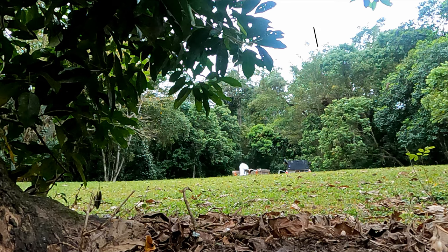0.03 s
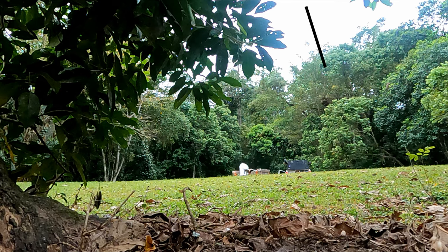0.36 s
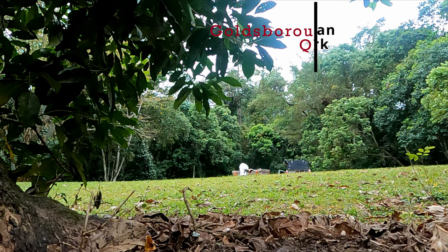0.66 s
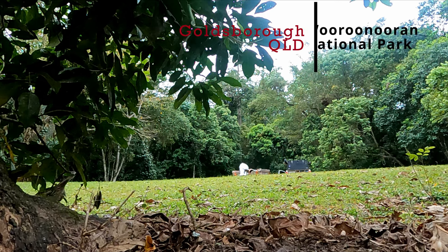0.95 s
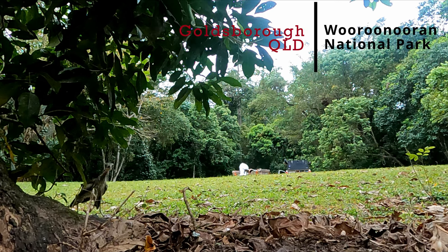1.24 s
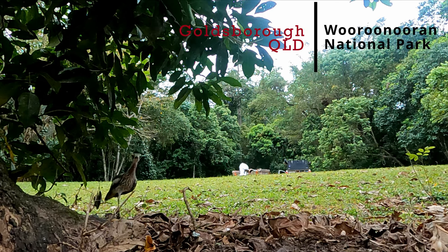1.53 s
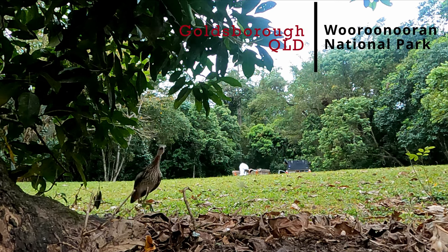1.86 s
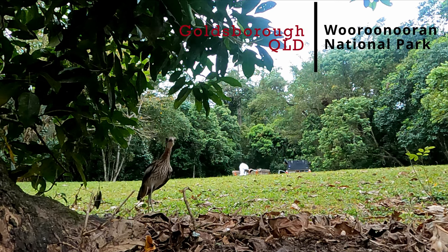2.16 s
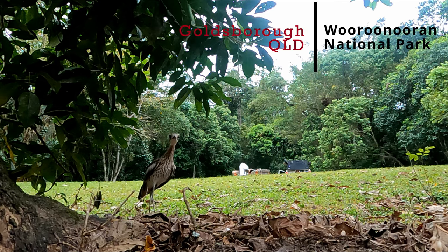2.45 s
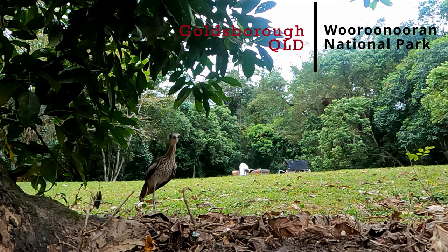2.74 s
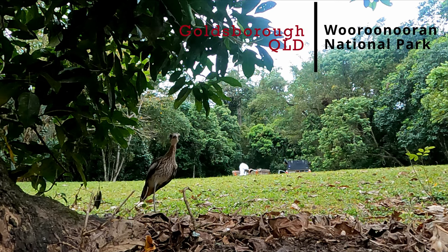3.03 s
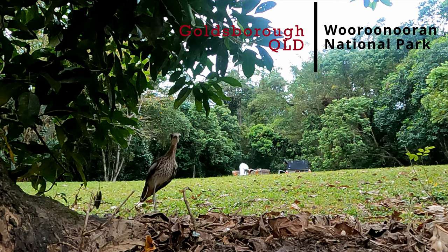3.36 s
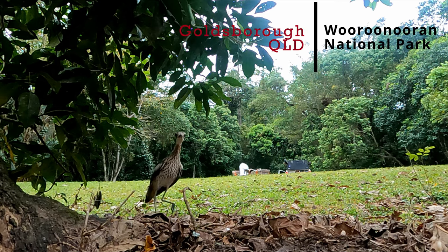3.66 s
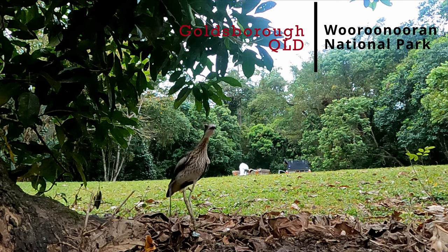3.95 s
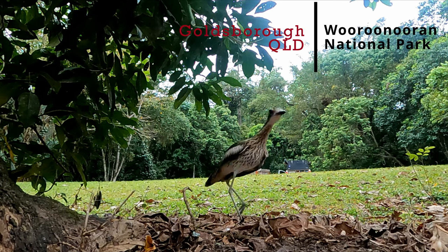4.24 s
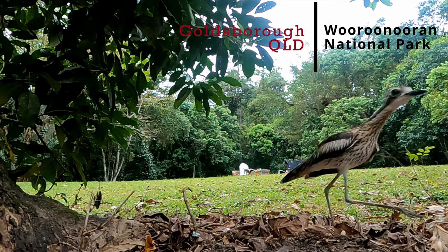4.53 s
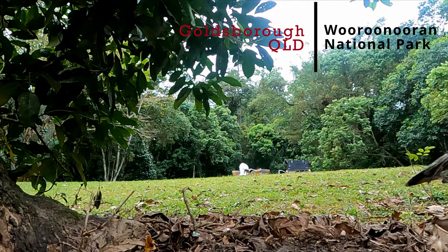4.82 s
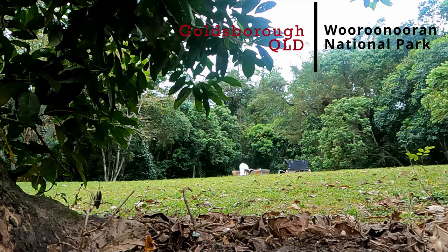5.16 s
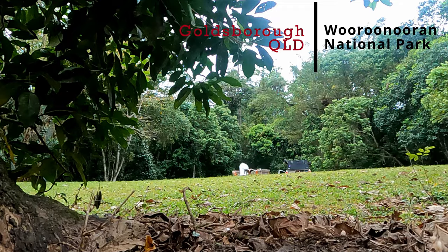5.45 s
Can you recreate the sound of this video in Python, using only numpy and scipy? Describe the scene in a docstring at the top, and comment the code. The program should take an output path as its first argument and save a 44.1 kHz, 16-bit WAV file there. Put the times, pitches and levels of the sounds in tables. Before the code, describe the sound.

A bird walks through dry leaf litter at the edge of a forest clearing. A quick flurry of crackling steps and snapping twigs gives way to a pause with small rustles. Then a louder flurry of crunches and soft thumps follows as it hurries close past the microphone. Faint far birds pipe and whistle throughout, over a low rush of air and a soft high hiss.

```python
"""Edge of a forest clearing: a long-legged bird walks through dry leaf litter. A flurry of steps,
a pause with small stirrings, then a louder flurry as it hurries past close by.
Leaves crackle and crush in many tiny fractures and scrape by stick-slip; twigs snap, knocked sticks
ring, feet thump the soil. Far birds pipe and whistle in the trees over low air and a soft high hiss."""
import sys
import numpy as np
from scipy import signal
from scipy.fft import rfft, irfft, next_fast_len
from scipy.io import wavfile
from scipy.ndimage import uniform_filter1d, map_coordinates

SR = 44100
rng = np.random.default_rng(int(sys.argv[2]) if len(sys.argv) > 2 else 0)


def master_out(mix):
    """Clip the mix to full scale and print it as 16-bit PCM to the path in sys.argv[1]."""
    frames = np.transpose(np.atleast_2d(mix))
    ceiling = np.clip(frames, -1, 1)
    pcm = np.round(ceiling * 32767).astype(np.int16)
    wavfile.write(sys.argv[1], SR, pcm)


N = 250929

# walking bird's path: t/s, left minus right/dB, nearness/0-1
PATH = [(1, 0, 0.7), (3.8, 0, 0.66), (4.55, -1, 0.87), (4.75, -1.5, 0.55), (4.96, -2.5, 1), (5.3, -1, 1)]
# fracture spectra of leaf edges, deep litter, whole leaves: f/Hz, level/dB
CRACKLE_SPECTRUM = [(300, -47), (1200, -20), (1900, -15), (2500, -11), (3300, -11), (4200, -0.5),
                    (5500, -0.5), (7000, -1.5), (8300, -10), (10500, -16.5), (12400, -16), (15500, -42)]
CRUSH_SPECTRUM = [(60, -35), (115, -13.5), (175, 3), (270, 1), (420, 0.5), (690, 0), (880, -8.5),
                  (1060, -3), (1500, -3.5), (1950, -16), (2800, -11.5), (4500, -26), (11000, -60)]
TEAR_SPECTRUM = [(600, -19.5), (1100, -4), (1900, 1), (2700, -0.5), (3800, 0), (5500, -5.5), (12000, -17),
                 (15500, -32)]


def amp(db):
    """Decibels to gain."""
    return 10 ** (np.asarray(db) / 20)


def unit(x):
    """x at rms 1."""
    return x / np.sqrt(np.mean(x ** 2) + 1e-20)


def clock():
    """Sample times in s."""
    return np.arange(N) / SR


def along(points, hz):
    """(f/Hz, value) points interpolated on a log axis."""
    f, v = np.transpose(points)
    return np.interp(np.log(hz + 1), np.log(f + 1), v)


def wobble(knots_per_s):
    """Smooth random curve."""
    return map_coordinates(rng.standard_normal(int(N * knots_per_s / SR) + 4), [clock() * knots_per_s])


def filtered(x, response):
    """x through a gain given as a function of f/Hz."""
    size = next_fast_len(N + SR // 2)
    return irfft(rfft(x, size) * response(np.fft.rfftfreq(size, 1 / SR)), size)[..., :N]


def struck(x, spectrum, size=2048):
    """Impulses x ring a minimum-phase, unit-energy response with this spectrum."""
    cepstrum = irfft(np.log(amp(along(spectrum, np.fft.rfftfreq(size, 1 / SR)))))
    cepstrum[1:size // 2] *= 2
    cepstrum[size // 2 + 1:] = 0
    ring = irfft(np.exp(rfft(cepstrum)))
    return signal.fftconvolve(x, ring[None] / np.linalg.norm(ring), axes=1)[:, :N]


def scattered(x, t60_s, size):
    """Diffuse echo off many surfaces, different at each ear."""
    t = np.arange(size) / SR
    tail = rng.standard_normal((2, size)) * amp(-60 * t / t60_s)
    tail /= np.linalg.norm(tail, axis=1, keepdims=True)
    return signal.fftconvolve(np.atleast_2d(x), tail, axes=1)[:, :N]


def rush(spectrum):
    """Stereo noise of rms 1, narrow in the bass, widest in the mids."""
    # f/Hz, left-right correlation
    coherence = [(60, 0.88), (150, 0.87), (300, 0.52), (640, 0.35), (1400, 0.19), (4000, 0.5),
                 (12000, 0.73)]

    def mid_side_gains(hz):
        angle = np.arccos(np.clip(along(coherence, hz), -1, 1)) / 2
        return amp(along(spectrum, hz)) * [np.cos(angle), np.sin(angle)]

    mid, side = filtered(rng.standard_normal((2, N)), mid_side_gains)
    return unit(np.array([mid + side, mid - side]))


def air():
    """Low, slightly wavering rush of air."""
    # f/Hz, level/dB
    spectrum = [(15, -24), (45, -8), (70, -13), (108, -20.5), (150, 1.5), (200, 0), (300, -2.5), (400, -10),
                (650, -16.5), (860, -21), (1100, -13), (1400, -15), (1900, -20.5), (3200, -27.5),
                (7000, -56)]
    return amp(-46 + 0.7 * wobble(7.3)) * rush(spectrum)


def high_hiss():
    """High background hiss of insects, far bird echoes and faint rustle, rising and falling in level."""
    # f/Hz, level/dB
    spectrum = [(2500, -23), (3700, -11), (4400, -3), (5000, 1.5), (6200, -1.5), (7300, -1), (8200, -17),
                (10000, -24), (12500, -26.5), (14500, -66)]
    # t/s, level/dB
    levels = [(0, -44), (.55, -50.5), (1.05, -45), (1.75, -50.5), (2.2, -45.5), (3.05, -47), (3.6, -45),
              (3.879, -50), (4.5, -46.5), (5.35, -45), (5.69, -50.5)]
    level_db = np.interp(clock(), *np.transpose(levels)) - 1.5 + 0.63 * wobble(18)
    return amp(level_db) * rush(spectrum)


def note(start_s, length_s):
    """Progress 0-1 through a note, and its rounded swell."""
    progress = np.clip((clock() - start_s) / length_s, 0, 1)
    return progress, np.sqrt(np.abs(np.sin(np.pi * progress)))


def piper():
    """Arched, wavering bird notes that open on harmonics 2 and 3 and swell into 4."""
    # t/s, fundamental/Hz, level/dB
    notes = [(0.415, 1130, -47.5), (2.31, 1116, -48), (2.6, 1131, -42.5), (2.955, 1129, -45.5),
             (3.23, 1099, -44.5), (5.29, 1170, -46), (5.485, 1160, -48.5)]
    out, waver = np.zeros(N), 1 + 0.0095 * wobble(160)
    for start_s, hz, db in notes:
        progress, swell = note(start_s, length_s=0.155)
        pitch_hz = hz * waver * (1 - 0.038 * (1 - swell))
        phase = 2 * np.pi * np.cumsum(pitch_hz) / SR
        on = swell > .001
        second, third, fourth = np.sin(np.outer([2, 3, 4], phase[on]))
        fade = 1 - progress[on]
        opening = amp(-9.5) * np.sqrt(fade) * second + amp(-13.5) * fade ** 2 * third
        out[on] += amp(db + 4.5) * swell[on] * (opening + swell[on] * fourth)
    return out * amp(1.7 * wobble(45))


def whistlers():
    """Small birds' gliding whistles, made buzzy by fast pitch flutter."""
    # t/s, length/s, centre f/Hz, glide/Hz, buzz width/Hz, level/dB
    calls = [(-.03, 0.083, 4620, 2, 130, -43), (0.021, 0.11, 4760, 198, 190, -43.5),
             (0.061, 0.055, 4963, 3, 45, -39), (0.248, 0.097, 7200, 99.5, 394, -50.5),
             (0.256, 0.084, 6520, -400, 71, -38.5), (0.299, 0.11, 6910, -1.5, 60.5, -44),
             (0.348, 0.054, 3180, 100, 85, -53.5), (0.547, 0.097, 7200, 130, 130, -46),
             (.705, 0.073, 5440, 120.5, 281, -45), (0.877, 0.071, 5910, 129.5, 341, -42.5),
             (1.072, 0.074, 7030, 131.5, 352, -43.5), (1.293, 0.093, 7030, 137, 288, -44.5),
             (2.334, 0.08, 7130, 131, 240, -50), (3.283, 0.07, 7330, 130, 221, -52),
             (4.05, 0.07, 6830, 280, 90, -38), (5.461, 0.072, 7080, 133.5, 227, -46)]
    out, flutter = np.zeros(N), wobble(700)
    for start_s, length_s, hz, glide_hz, buzz_hz, db in calls:
        progress, swell = note(start_s, length_s)
        pitch_hz = hz + glide_hz * (progress - .5) + buzz_hz * flutter
        out += amp(db + 5.5) * swell * np.sin(2 * np.pi * np.cumsum(pitch_hz) / SR)
    return out


def distant(song, echo_db):
    """Direct song plus echo from the trees ahead and, weaker, from those around."""
    ahead, around = scattered(song, t60_s=1.0, size=SR)
    return amp(-3) * song + amp(echo_db) * (ahead + amp(-7) * np.array([around, -around]))


def forest():
    """Far birds, air and high hiss, 1 dB louder on the right."""
    birds = distant(piper(), echo_db=-3.5) + distant(whistlers(), echo_db=-2)
    return (birds + air() + high_hiss()) * amp([[-.5], [.5]])


def scrapes():
    """A stiff leaf edge sticks and slips; the slips ring one resonance of the leaf."""
    # peak t/s, f/Hz, level/dB, half-length/s
    chirps = [(1.997, 3970, -41.5, 0.037), (2.531, 4200, -44.5, 0.017)]
    slips_per_s, width_hz = 720, 1000
    out = np.zeros((2, N))
    for peak_s, hz, db, half_s in chirps:
        leaf = signal.butter(2, [hz - width_hz / 2, hz + width_hz / 2], "bandpass", fs=SR, output="sos")
        slips = (rng.random(N) < slips_per_s / SR) * rng.choice([-1, 1], N)
        swell = np.exp(-2 * ((clock() - peak_s) / half_s) ** 2)
        out += amp(db) * swell * unit(signal.sosfilt(leaf, slips))
    return out


def sticks():
    """A foot knocks a fallen stick, which rings briefly on the damp ground."""
    # t/s, level/dB
    knocks = [(1.5102, -31.5), (1.5398, -23.5), (1.8388, -18), (4.558, -22.5), (5.151, -19.5)]
    # f/Hz, level/dB, t60/s
    modes = [(620, -6, 0.023), (1154, -3, 0.019), (1550, -9, 0.018)]
    out, t = np.zeros(N), np.arange(SR // 20) / SR
    for start_s, db in knocks:
        for hz, mode_db, t60_s in modes:
            mode = np.sin(2 * np.pi * hz / rng.normal(1, 0.065) * t)
            out[round(start_s * SR):][:len(t)] += amp(db + mode_db - 60 * t / t60_s) * mode
    return out


def thumps():
    """A footfall on soil gives a few low, quickly damped cycles."""
    # t/s, level/dB, f/Hz
    footfalls = [(1.5409, -28, 317), (1.619, -30, 400), (1.839, -19.5, 402), (1.871, -22, 454),
                 (4.711, -18, 228), (4.957, -9, 200), (4.967, -15, 165), (5.129, -19, 106)]
    rise_s, t60_s = 0.0031, 0.033
    out, t = np.zeros(N), np.arange(SR // 10) / SR
    for start_s, db, hz in footfalls:
        envelope = amp(db + 5.5 - 60 * t / t60_s) * (1 - np.exp(-t / rise_s))
        out[round(start_s * SR):][:len(t)] += envelope * np.sin(2 * np.pi * hz * t)
    return signal.sosfilt(signal.butter(2, 100, "highpass", fs=SR, output="sos"), out)


def twigs():
    """A snap is a click and a few ms of splintering; thick twigs add a woody body."""
    # t/s, level/dB, relative body level/dB, splintering t60/s
    snaps = [(1.153, -19, -12.5, 0.012), (1.6797, -10, -25.5, .012), (1.8029, -20, 9, 0.005),
             (1.8503, -3, -8, 0.021), (1.855, 0.5, -13, 0.015), (2.5221, -23, -4, 0.016),
             (2.905, -17, -18, 0.015), (3.583, -23, -16, 0.025), (4.2918, -18, -15, 0.013),
             (4.534, -20, -18, .009), (4.562, -9.5, -6, 0.016), (4.7118, -6, -1, 0.007),
             (4.893, -12.5, -3, 0.012), (4.9148, -12, 0, 0.01), (4.955, -9, 7.5, 0.0035),
             (4.9626, -7, 1, 0.003), (4.9738, -14, 4, 0.0057), (5.003, -2, 1, 0.0019),
             (5.012, -6, 3.5, 0.003), (5.0534, -3, -14, .003), (5.0775, -4.5, -16, 0.0094),
             (5.1007, -13, -4, 0.0051), (5.1205, -8.5, -7, 0.0054), (5.2576, -9.5, -3, 0.0047)]
    tips, bodies, t = np.zeros((1, N)), np.zeros((1, N)), np.arange(SR // 25) / SR
    for start_s, db, body_db, t60_s in snaps:
        splinters = 0.24 * rng.standard_normal(len(t)) * amp(-60 * t / t60_s)
        splinters[0] = 1  # click
        tips[0, round(start_s * SR):][:len(t)] += amp(db) * splinters
        bodies[0, round(start_s * SR):][:len(t)] += amp(db + body_db) * splinters
    wood = amp(2) * struck(bodies, CRUSH_SPECTRUM) + amp(-15) * struck(bodies, TEAR_SPECTRUM)
    return amp(-3) * struck(tips, CRACKLE_SPECTRUM) + wood


def presses(contacts, attack_s):
    """Envelope: each contact rises and dies, bent leaves spring back; contacts add in power."""
    settle_db, settle_s = -31, 0.13
    peak_s, db, release_s = np.transpose(contacts)[:, :, None]
    t = clock() - peak_s

    def shape(fall_s):
        return amp(-20 * np.minimum(np.where(t < 0, (t / attack_s) ** 2, t / fall_s), 10))

    envelopes = amp(db) * np.maximum(shape(release_s), amp(settle_db) * shape(settle_s))
    return np.linalg.norm(envelopes, axis=0)


def fractures(per_s, spectrum, spread_db, width):
    """Tiny breaks of random size and stereo position, each ringing with the spectrum."""
    chance = np.clip(per_s / SR, 1e-4, 1)
    sizes = rng.choice([-1, 1], N) * amp(spread_db * np.clip(rng.standard_normal(N), -2, 2))
    breaks = (rng.random(N) < chance) * sizes / np.sqrt(chance)
    pan = width * rng.standard_normal(N)
    return struck(unit(breaks * np.array([1 + pan, 1 - pan])), spectrum)


def leaf_colour(x, depth_db):
    """Each leaf has its own resonances, so the colour keeps shifting."""
    frames = signal.stft(x, nperseg=512)[2]
    field = uniform_filter1d(rng.standard_normal(frames.shape[1:]), size=5, axis=0)
    field = uniform_filter1d(field, size=4, axis=1)
    return unit(signal.istft(frames * amp(depth_db * unit(field)), nperseg=512)[1][:, :N])


def leaves():
    """The harder the press, the more leaves break; a heavy tread crushes the deeper layers."""
    # foot strikes and leg sweeps: peak t/s, level/dB, 20 dB fall time/s
    steps = [(1.158, -38, 0.15), (1.203, -36.5, 0.05), (1.514, -41, 0.1), (1.544, -44, 0.1),
             (1.59, -41, 0.16), (1.624, -34, 0.14), (1.682, -26.5, 0.0242), (1.81, -26.5, 0.055),
             (1.84, -29.5, 0.0233), (1.856, -23, 0.0163), (1.876, -26, 0.04), (1.895, -32.5, 0.0556),
             (2.905, -43, 0.14), (4.298, -40, 0.14), (4.718, -32, 0.08), (4.919, -30.5, 0.22),
             (4.962, -25.5, 0.0625), (5.0, -27, 0.03), (5.105, -33.5, 0.0657), (5.15, -35.5, 0.06)]
    sweeps = [(.88, -45.5, 0.3), (1.394, -32, 0.0648), (1.948, -38, 0.12), (2.0, -44, 0.2),
              (2.11, -44, 0.43), (3.46, -47, 0.35), (3.6, -41, 0.17), (3.714, -38.5, 0.05),
              (3.995, -42.5, 0.1), (4.09, -44.5, 0.2), (4.24, -46.5, 0.37), (4.565, -34.5, 0.065),
              (4.757, -31.5, 0.11), (4.87, -46, 0.5), (5.06, -39, 0.17), (5.195, -39, 0.0847),
              (5.24, -35.5, 0.0257), (5.3, -48, 0.35)]
    # light when stalking, heavy when hurrying: t/s, crush over crackle/dB
    tread = [(1.4, -13), (1.545, -2), (1.57, -1.5), (1.62, -3), (1.68, -9), (1.82, -3), (2.1, -10.5),
             (3.6, -9.5), (4.4, -9.5), (4.55, -3), (4.72, 4), (5.3, 2.5)]
    crackle = np.hypot(presses(steps, attack_s=0.012), presses(sweeps, attack_s=0.043))
    crush = crackle * amp(np.interp(clock(), *np.transpose(tread)))
    breaks_per_s = 700 + 7000 * crackle / crackle.max()
    clumping = amp(0.43 * wobble(220))
    edges = fractures(breaks_per_s, CRACKLE_SPECTRUM, spread_db=-1.5, width=0.26)
    edges = amp(0.14) * crackle * leaf_colour(edges, depth_db=2.5)
    layers = crush * fractures(.5 * breaks_per_s, CRUSH_SPECTRUM, spread_db=3.5, width=0.1)
    # papery tearing of whole leaves, stronger close by
    path_s, _, nearness = np.transpose(PATH)
    tearing = crush * fractures(.5 * breaks_per_s, TEAR_SPECTRUM, spread_db=2.5, width=0.56)
    tearing *= np.interp(clock(), path_s, nearness)
    stalks = amp(-8) * crackle * fractures(100, CRACKLE_SPECTRUM, spread_db=-1.5, width=0.25)
    return stalks + clumping * (edges * amp([[.7], [-.7]]) + layers + tearing * amp([[-2], [1.5]]))


def walker():
    """The bird's feet, echoed by nearby litter and a trunk, drifting to the right."""
    feet = leaves() + twigs() + sticks() + scrapes() + thumps()
    feet += amp(-11.5) * scattered(feet, t60_s=0.06, size=4000)
    path_s, balance_db, _ = np.transpose(PATH)
    lean_db = np.interp(clock(), path_s, balance_db) / 2
    left, right = feet * amp([lean_db, -lean_db])
    # sound from the right arrives a fraction of a sample later on the left
    left = map_coordinates(left, [np.arange(N) + 0.18 * lean_db], order=5)
    return np.array([left, right])


def scene():
    """The walking bird in front of the forest."""
    return walker() + forest()


def record(dry):
    """Brick-wall low-pass."""
    return filtered(dry, lambda hz: hz < 15750)


dry = scene()
out = record(dry)
master_out(out)
```